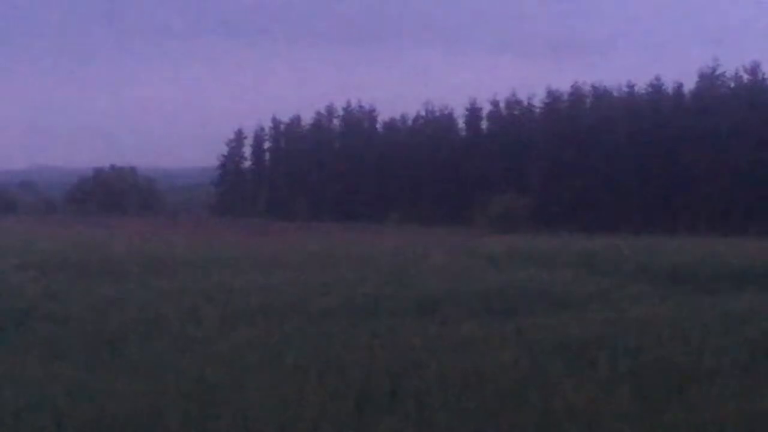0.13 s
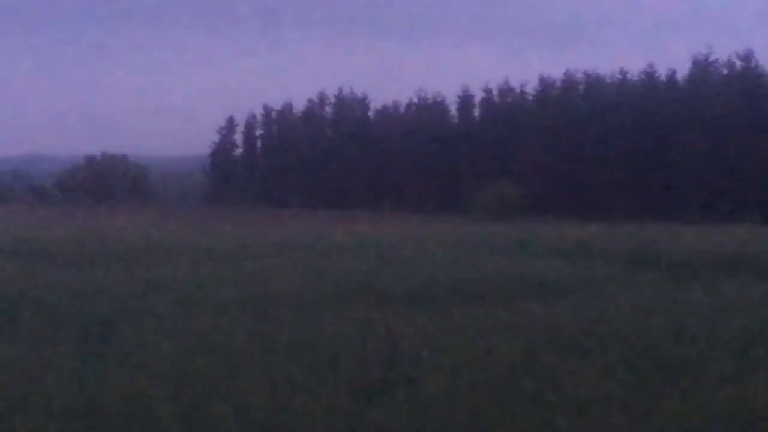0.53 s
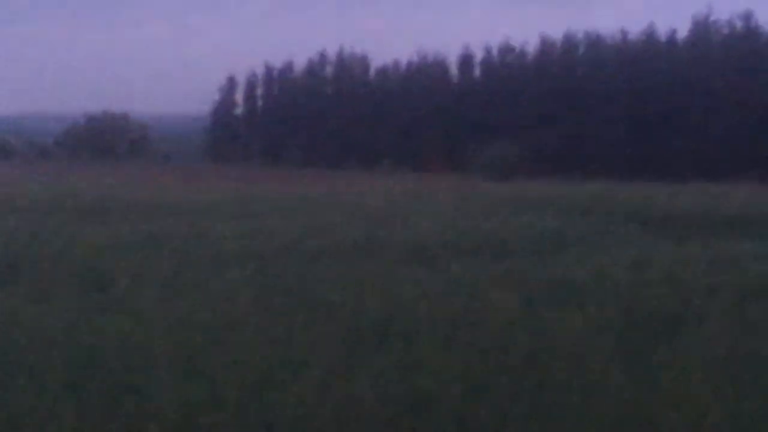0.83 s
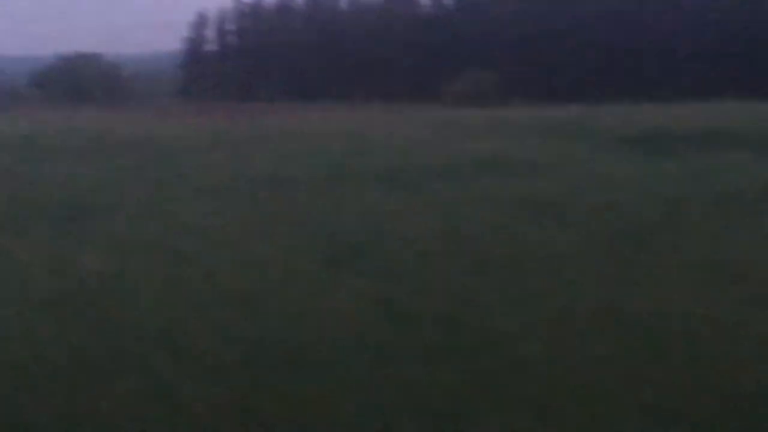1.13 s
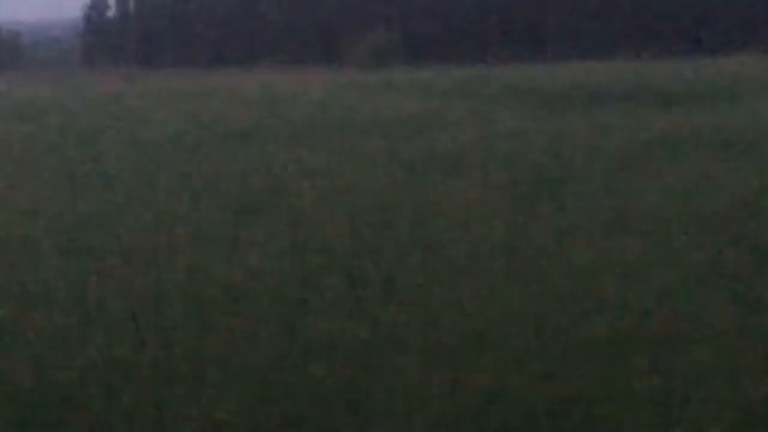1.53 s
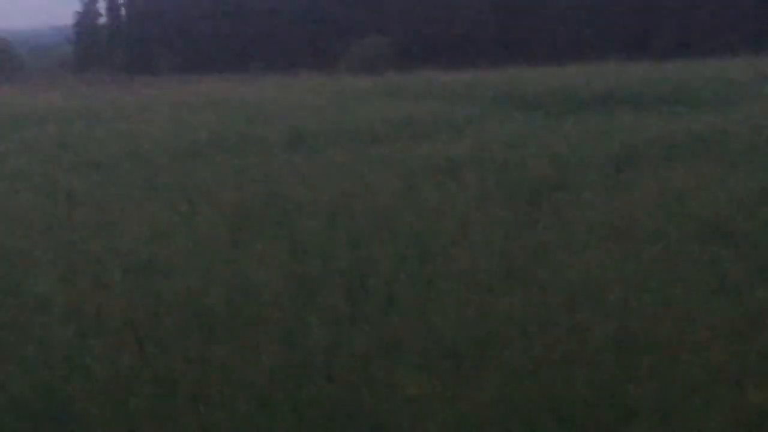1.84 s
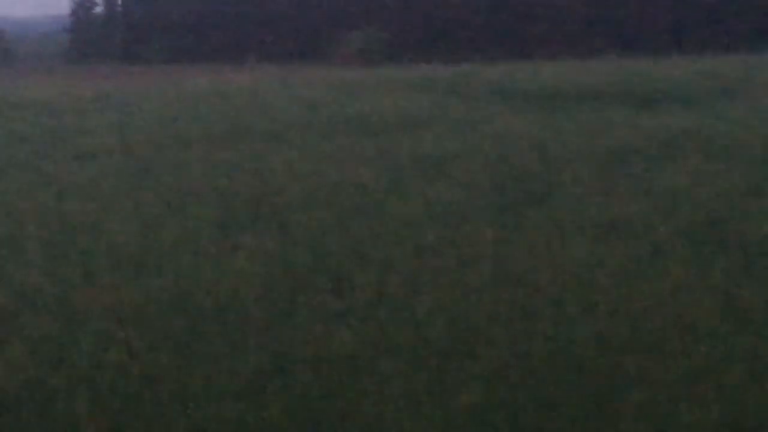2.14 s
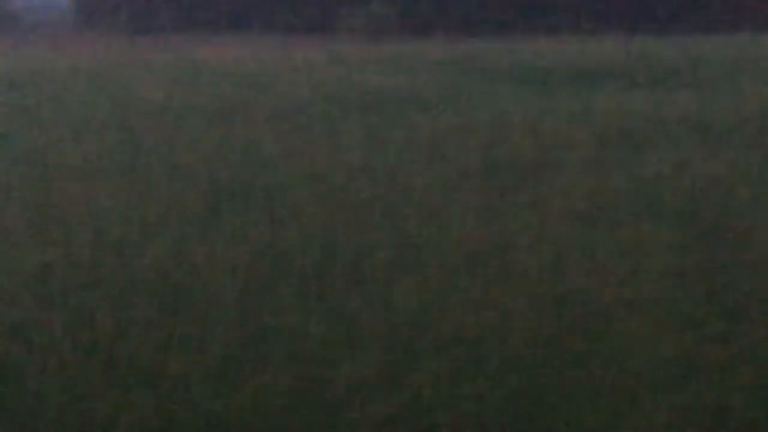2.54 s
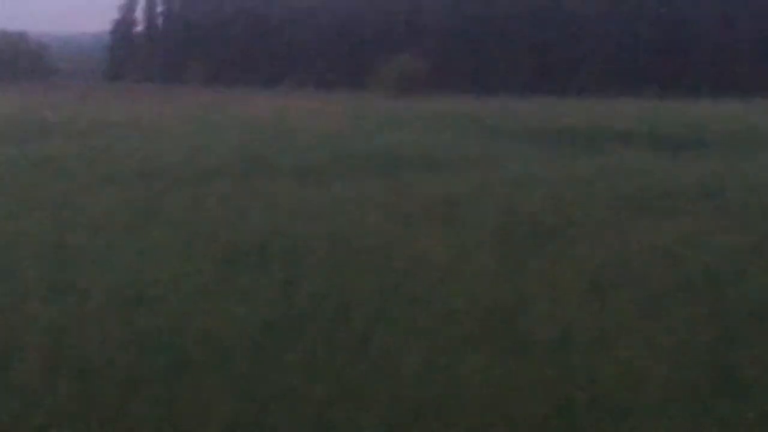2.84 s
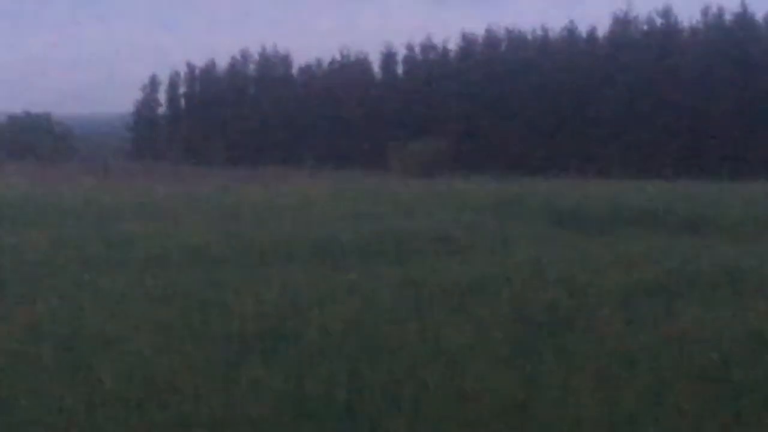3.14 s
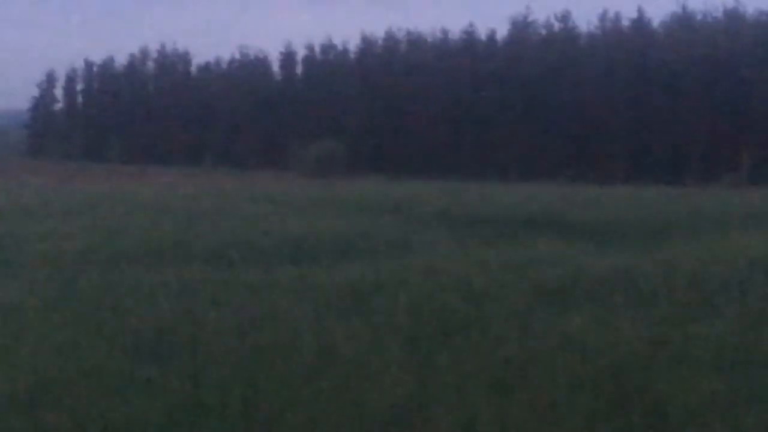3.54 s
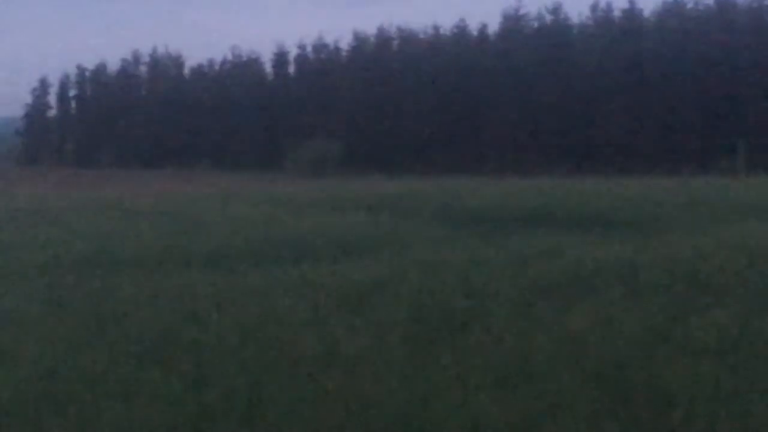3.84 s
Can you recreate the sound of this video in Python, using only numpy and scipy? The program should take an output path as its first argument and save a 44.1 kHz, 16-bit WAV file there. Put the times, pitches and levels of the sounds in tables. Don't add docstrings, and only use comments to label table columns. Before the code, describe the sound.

A roe deer gives one hoarse, harsh bark across a dusk field, echoing off the forest

```python
import sys
import numpy as np
from scipy import signal
from scipy.fft import rfft, irfft
from scipy.io import wavfile
from scipy.ndimage import uniform_filter1d

SR = 44100
rng = np.random.default_rng(int(sys.argv[2]) if len(sys.argv) > 2 else 0)


def inscribe(sig):
    pcm = np.round(np.clip(np.atleast_2d(sig).T, -1, 1) * 32767)
    wavfile.write(sys.argv[1], SR, pcm.astype(np.int16))


def natural_amplitude(level_db):
    exponent = np.asarray(level_db, float) / 20
    return 10 ** exponent


N = 176400

# (time [s], effort [dB], pulse rate [Hz])
BARK = [
    (3.355, -48.5, 165.8),
    (3.426, -34.5, 179.1),
    (3.453, -37.5, 180.5),
    (3.541, -37, 181.8),
    (3.615, -36.5, 179.8),
    (3.661, -40, 172.8),
    (3.684, -50, 162),
    (3.722, -50, 147.3),
    (3.747, -84.5, 147),
]
MOUTH_HZ = [1170, 1430, 1450, 1520, 1390, 1110, 1010, 940, 900]
# (open-mouth frequency [Hz], width [Hz], level [dB], share of mouth movement [0-1],
# loss with the mouth shut [dB])
THROAT = [(278, 54, -20, 0.03, 9.5), (474, 40, -34.5, 0.09, -22), (749, 82, -11.5, 0.85, 38.5),
          (1050, 145, -9.5, 0.09, 13), (1500, 100, 0, 1, 18), (1858, 380, -18.5, 0.31, -15),
          (2300, 230, -18, 0, 5), (2800, 300, -17.5, 0.3, 15), (3280, 440, -26, 0, 33),
          (4560, 450, -32.5, 0.77, 42), (6600, 610, -35.5, 0.35, 58), (11300, 1700, -34, 0.4, 58)]
# (frequency [Hz], density [dB per Hz])
WIND = [(15, -47), (25, -31), (54, 3.5), (70, 1), (92, -2), (181, -17.5), (248, -23.5), (399, -30),
        (500, -42), (650, -72), (1100, -120)]
# (frequency [Hz], density [dB per Hz])
HISS = [(180, -36), (300, -4.5), (822, -8.5), (2180, -10), (2570, -12), (4980, -18), (5870, -15.5),
        (7530, -17), (15600, -13)]
# (start [s], length [s], level [dB], start pitch [Hz], end pitch [Hz])
FLUTE = [(1.17, 0.072, -70.5, 2494, 2410), (1.25, 0.037, -70, 2350, 2300), (1.36, 0.098, -84, 2420, 2370),
         (1.64, 0.12, -72, 2300, 2000), (1.98, 0.043, -75, 2473, 2120), (2.03, 0.078, -84, 2140, 2300),
         (2.1, .1, -74, 2130, 1900), (2.2, 0.066, -70.5, 1882, 1804), (2.27, 0.082, -79, 1800, 1620),
         (2.37, 0.044, -73, 2180, 2310), (2.41, 0.13, -73, 2460, 2510), (2.56, .12, -80, 1810, 1684),
         (2.29, 0.087, -68, 3700, 3760), (.13, 0.113, -76, 2165, 2064)]
# (start [s], length [s], level [dB], start pitch [Hz], end pitch [Hz])
MELLOW = [
    (1.86, .03, -85.5, 1160, 1210),
    (1.965, 0.042, -70.5, 1140, 1144),
    (2.06, 0.033, -78, 1050, 1020),
    (2.19, 0.085, -74.5, 1282, 1200),
    (2.35, 0.086, -72, 1126, 1266),
    (2.92, .13, -73, 1200, 1138),
    (3.06, .06, -82, 1120, 1320),
    (3.115, 0.068, -72, 1450, 1367),
]
# (low note start [s], low note level [dB], high note level [dB], high note pitch [Hz])
TRILL = [
    (2.543, -59.5, -77, 3650),
    (2.686, -58.5, -72, 3720),
    (2.832, -59, -68, 3600),
    (2.973, -58, -67.5, 3640),
    (3.12, -59.5, -64, 3740),
    (3.276, -58.5, -62.5, 3740),
]
# (start [s], length [s], level [dB], frequency [Hz])
BUMPS = [
    (.66, 0.089, -61.5, 145),
    (.84, 0.092, -58.5, 149),
    (1.82, 0.091, -59, 168),
    (2.45, 0.081, -65, 127),
    (2.66, 0.18, -65, 103),
]
# (time [s], peak level [dB], shell resonance [Hz], brightness [0-1])
TICKS = [
    (.728, -60, 1450, .3),
    (.754, -38.5, 620, 0.35),
    (1.878, -68, 1300, 0.1),
    (2.591, -52, 2600, 0.9),
    (2.852, -43.5, 770, 0),
    (3.003, -63, 1800, .3),
    (3.257, -49.5, 5840, .8),
    (3.299, -52, 10200, 0.2),
]
# (start [s], length [s], level [dB], centre [Hz], width [Hz])
RUSTLES = [
    (0.831, 0.091, -68.5, 5970, 6400),
    (0.909, 0.14, -73, 6500, 6140),
    (2.315, 0.066, -70.5, 6940, 7000),
    (2.586, .09, -73, 6600, 1520),
    (2.703, 0.034, -72.5, 13800, 4000),
    (3.992, 0.0112, -56.5, 490, 890),
]
# (frequency [Hz], width [Hz], level [dB])
NOTCHES = [(5040, 280, -2), (7670, 320, -2.), (10450, 300, -6)]

EARLIER_S, EARLIER_DB = 3.626, -2
OPEN_HZ = 1500
JITTER, SHIMMER_DB, WEAK_DB, PATCHY_DB = .055, 2.2, -2., 2.
ROUGH, PUFF_FLOOR, PUFF_CYCLE = .4, .15, .3
GROUND, GROUND_S = .4, 0.002306
SQUEEZE = 2.2
CHEST_DB, RISE_S = -16.5, 0.03
LEAD = 22050
ECHO_S, ECHO_RISE_S = .4, 0.22
WALL_DB, WALL_T60, ECHO_LO_HZ, ECHO_HI_HZ = -11., 1.2, 600, 1250
DEEP_DB, DEEP_T60, DEEP_LO_HZ, DEEP_HI_HZ = -15.5, 3.8, 574, 1190
HAZE_DB, HAZE_LO_HZ, HAZE_HI_HZ = -16, 1900, 2600
GRASS_DB, GRASS_T60 = -17., .25
WIND_DB, HISS_DB = -57, -70
FLUTE_ARCH, FLUTE_WET_DB, MELLOW_ARCH, MELLOW_WET_DB = 0.017, -2., .11, -16.
LOW_S, LOW_START_HZ, DIP_HZ, LOW_END_HZ = 0.0422, 3295, 3040, 3202
HIGH_S, HIGH_LEAD_S, HIGH_WIDTH_HZ = 0.052, .045, 220
BIRD_WET_DB, BIRD_T60 = -4., .35
TICK_T60 = 0.0046
START_S, START_FADE_S, EDGE_HZ = .0722, .0012, 15730


def evened(x):
    return x / np.sqrt(np.mean(x ** 2) + 1e-20)


def add(mix, s, sound):
    part = mix[round(s * SR):][:len(sound)]
    part += sound[:len(part)]


def resonate(x, hz, width_hz):
    turn = np.exp(2j * np.pi * np.cumsum(hz * np.ones(len(x))) / SR)
    r = np.exp(-np.pi * width_hz / SR)
    baseband = signal.lfilter([1 - r], [1, -r], x / turn + 1e-18)
    return 2 * (turn * baseband).real


def band(x, lo_hz, hi_hz):
    sos = signal.butter(2, [lo_hz, hi_hz], "bandpass", fs=SR, output="sos")
    return signal.sosfilt(sos, x)


def span(length):
    u = np.arange(0, length, 1 / SR) / length
    return u, np.sqrt(np.sin(np.pi * u))


def scatter(t60, size):
    tail = rng.standard_normal(size) * natural_amplitude(-60 * np.arange(size) / SR / t60)
    return tail / np.linalg.norm(tail)


def voice_source(t, s, turns):
    wobble, size, *patches = np.tanh(rng.standard_normal((200, 16)).T) * 1.6
    rough_turns = turns + JITTER * np.interp(turns, np.arange(len(size)), wobble)
    k = np.floor(rough_turns).astype(int).clip(0)
    strength = natural_amplitude(SHIMMER_DB * size[k] + WEAK_DB * (k % 2))
    clicks = strength * (np.diff(np.maximum.accumulate(k), prepend=0) > 0)
    puff_shape = PUFF_FLOOR + np.exp(-(rough_turns % 1) / PUFF_CYCLE)
    puffs = strength * puff_shape * rng.standard_normal(len(t))
    drive = (1 - ROUGH) * evened(clicks) + ROUGH * evened(puffs)
    return drive, [PATCHY_DB * patch[k] for patch in patches]


def throat_filter(drive, patches_db, shut):
    throat = 0
    for n, (hz, width_hz, db, share, lost_db) in enumerate(THROAT):
        moving_hz = hz * (1 + share * shut)
        ring = resonate(drive * natural_amplitude(patches_db[n]), moving_hz, width_hz)
        ring = resonate(ring, moving_hz, 3 * width_hz)
        throat = throat + (-1) ** n * natural_amplitude(db + lost_db * shut) * evened(ring)
    throat = throat + GROUND * np.roll(throat, round(GROUND_S * SR))
    throat = throat / np.sqrt(uniform_filter1d(throat ** 2, size=1100))
    swing = uniform_filter1d(abs(signal.hilbert(throat)), size=60) / SQUEEZE + 1e-9
    return throat * np.tanh(swing) / swing


def bark():
    s, effort_db, rate_hz = np.transpose(BARK)
    t = np.arange(s[0], s[-1], 1 / SR)
    turns = np.cumsum(np.interp(t, s, rate_hz)) / SR
    drive, patches_db = voice_source(t, s, turns)
    shut = np.interp(t, s, MOUTH_HZ) / OPEN_HZ - 1
    throat = throat_filter(drive, patches_db, shut)
    effort = np.interp(t, s, effort_db)
    chest_db = CHEST_DB + effort.max() + 0.18 * (effort - effort.max())
    chest = natural_amplitude(chest_db) * np.cos(2 * np.pi * turns)
    rise = np.minimum((t - s[0]) / RISE_S, 1)
    return natural_amplitude(effort) * throat * rise + chest * span(len(t) / SR - 1e-6)[1]


def deer():
    dry = np.zeros(N + LEAD)
    start_s = BARK[0][0] + LEAD / SR
    add(dry, start_s, bark())
    add(dry, start_s - EARLIER_S, natural_amplitude(EARLIER_DB) * bark())
    size = 2 * SR
    trees = natural_amplitude(WALL_DB) * band(scatter(WALL_T60, size), ECHO_LO_HZ, ECHO_HI_HZ)
    trees = trees + natural_amplitude(DEEP_DB) * band(scatter(DEEP_T60, size), DEEP_LO_HZ, DEEP_HI_HZ)
    trees = trees + natural_amplitude(HAZE_DB) * band(scatter(WALL_T60, size), HAZE_LO_HZ, HAZE_HI_HZ)
    trees = trees * np.minimum(np.arange(size) / SR / ECHO_RISE_S, 1)
    trees = np.pad(trees, (round(ECHO_S * SR), 0))
    add(trees, .005, natural_amplitude(GRASS_DB) * scatter(GRASS_T60, size=SR // 2))
    return (dry + signal.fftconvolve(dry, trees)[:N + LEAD])[LEAD:]


def bed(points, db, patchy_db, swell_db, size):
    frames, hz = 4 * N // size + 5, np.fft.rfftfreq(size, 1 / SR)
    a, b, patches = rng.standard_normal((frames, len(hz), 3)).T
    swell = evened(uniform_filter1d(patches[0], size=9))
    patches = uniform_filter1d(patches, size=10, axis=0)
    patches = evened(uniform_filter1d(patches, size=10, axis=1))
    f, level = np.transpose(points)
    level = np.interp(np.log(hz + 1), np.log(f + 1), level, left=-90, right=-90)
    z = (a + 1j * b) * natural_amplitude(level[:, None] + patchy_db * patches + swell_db * swell)
    noise = signal.istft(z, nperseg=size, noverlap=3 * size // 4)[1][:N]
    return natural_amplitude(db) * evened(noise)


def wind():
    return bed(WIND, WIND_DB, patchy_db=1.0, swell_db=2.05, size=4096)


def hiss():
    return bed(HISS, HISS_DB, patchy_db=-1.7, swell_db=1.3, size=1024)


def whistle(hz, db, envelope):
    flutter = evened(uniform_filter1d(rng.standard_normal(SR // 4), size=300))[:len(hz)]
    return natural_amplitude(db + 2 * flutter) * envelope * np.sin(2 * np.pi * np.cumsum(hz) / SR)


def blurred(mix, trees, wet_db):
    return mix + natural_amplitude(wet_db) * signal.fftconvolve(mix, trees)[:N]


def whistler(notes, arch, wet_db, trees):
    mix = np.zeros(N)
    for s, length, db, a_hz, b_hz in notes:
        u, envelope = span(length)
        hz = (a_hz + (b_hz - a_hz) * u) * (1 + arch * np.sin(np.pi * u))
        add(mix, s, whistle(hz, db, envelope))
    return blurred(mix, trees, wet_db)


def trill(trees):
    mix = np.zeros(N)
    for s, low_db, high_db, high_hz in TRILL:
        u, envelope = span(LOW_S)
        hz = np.interp(u, [0, .25, .6], [LOW_START_HZ, DIP_HZ, LOW_END_HZ])
        add(mix, s, whistle(hz, low_db, envelope))
        u, envelope = span(HIGH_S)
        hz = high_hz * np.interp(u, [0, .3, .75, 1], [.96, 1.02, 1.0, .93])
        buzz = resonate(rng.standard_normal(len(u)), hz, HIGH_WIDTH_HZ)
        buzz = resonate(buzz, hz, HIGH_WIDTH_HZ)
        add(mix, s - HIGH_LEAD_S, natural_amplitude(high_db) * envelope * evened(buzz))
    return blurred(mix, trees, BIRD_WET_DB)


def birds():
    trees = scatter(BIRD_T60, size=SR // 2)
    flute = whistler(FLUTE, FLUTE_ARCH, FLUTE_WET_DB, trees)
    mellow = whistler(MELLOW, MELLOW_ARCH, MELLOW_WET_DB, trees)
    return flute + mellow + trill(trees)


def hand_bumps():
    mix = np.zeros(N)
    for s, length, db, hz in BUMPS:
        u, envelope = span(length)
        thud = resonate(resonate(rng.standard_normal(len(u)), hz, 100), hz, 100)
        add(mix, s, natural_amplitude(db) * envelope * evened(thud))
    return mix


def finger_ticks():
    mix, t = np.zeros(N), np.arange(1000) / SR
    for s, db, hz, bright in TICKS:
        snap = bright * rng.standard_normal(len(t)) * natural_amplitude(-60 * t / 0.0024)
        ring = np.sin(2 * np.pi * hz * t) * natural_amplitude(-60 * t / TICK_T60)
        add(mix, s, natural_amplitude(db) * (snap + ring))
    return mix


def cloth_rustles():
    mix = np.zeros(N)
    for s, length, db, hz, width_hz in RUSTLES:
        u, envelope = span(length)
        grain, clump = rng.standard_normal((SR // 4, 2))[:len(u)].T
        clump = natural_amplitude(3.0 * evened(uniform_filter1d(clump, size=150)))
        rustle = resonate(resonate(grain * clump, hz, width_hz), hz, width_hz)
        add(mix, s, natural_amplitude(db) * envelope * evened(rustle))
    return mix


def scene():
    handling = hand_bumps() + finger_ticks() + cloth_rustles()
    return (deer() + wind() + hiss() + birds() + handling)[None]


def top_cut(x):
    return signal.sosfilt(signal.butter(12, 15720, fs=SR, output="sos"), x)


def record(dry):
    hz = np.fft.rfftfreq(N, 1 / SR)
    colour_db = sum(db * np.exp(-((hz - f_hz) / width_hz) ** 2) for f_hz, width_hz, db in NOTCHES)
    coloured = irfft(rfft(dry) * natural_amplitude(colour_db) * (hz < EDGE_HZ), N)
    fade_in = np.clip((np.arange(N) / SR - START_S) / START_FADE_S, 0, 1)
    return top_cut(coloured * fade_in)


dry = scene()
out = record(dry)
inscribe(out)
```